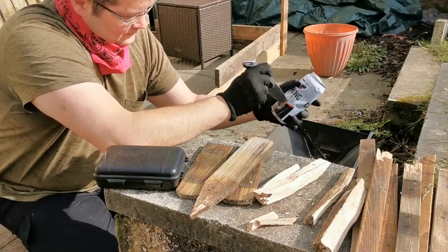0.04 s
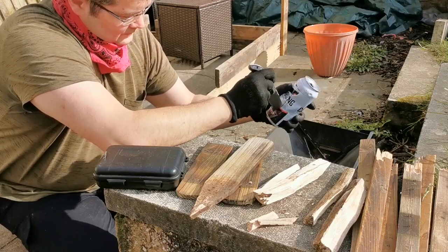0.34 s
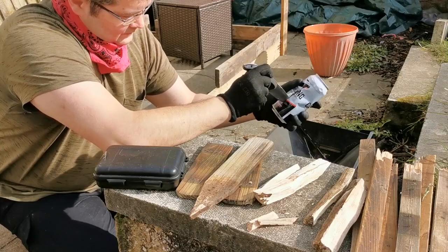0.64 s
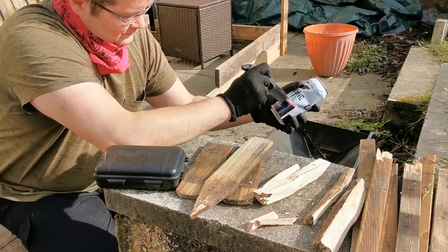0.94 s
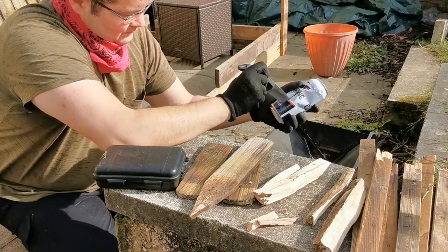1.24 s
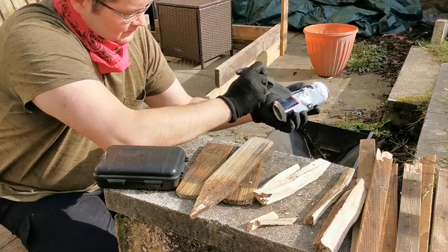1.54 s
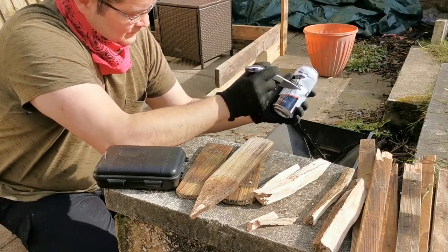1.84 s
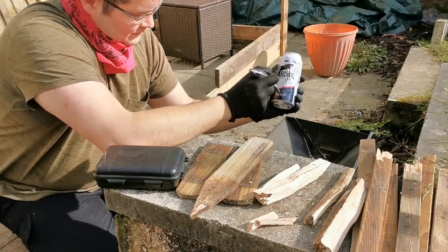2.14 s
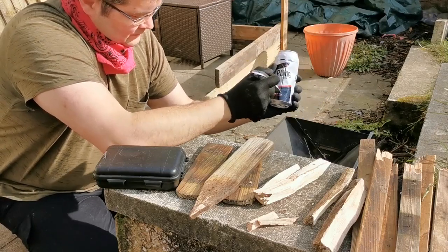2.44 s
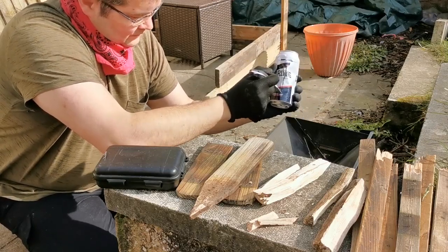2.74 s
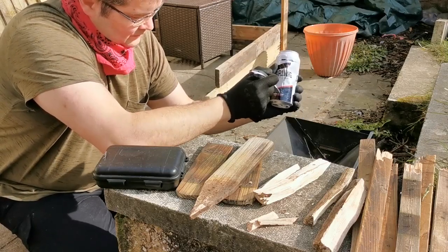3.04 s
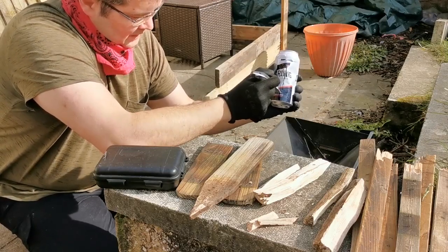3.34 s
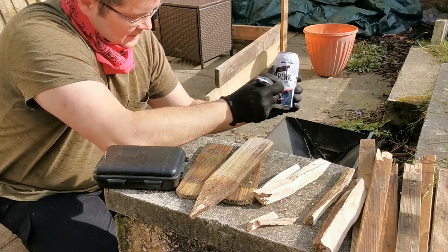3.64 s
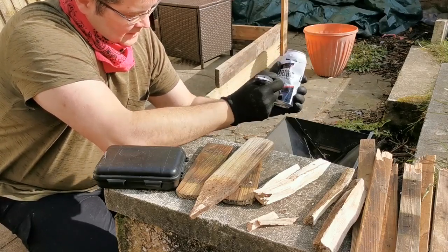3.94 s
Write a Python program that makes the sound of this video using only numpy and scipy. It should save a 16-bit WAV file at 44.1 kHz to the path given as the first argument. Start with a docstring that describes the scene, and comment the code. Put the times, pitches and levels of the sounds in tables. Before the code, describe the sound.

Hollow snaps and brief tearing scrapes come from a drinks can being cut in a yard. After a pause, one sharp crack and some lighter clicks follow, over a faint rumble and a little breeze on the microphone.

```python
"""On a patio, gloved hands turn a thin aluminium drinks can and work it with a blade.
The wall buckles in short hollow snaps, a few leaving a tone ringing on; between them the metal
tears and scrapes in dense runs of tiny slips that excite the same modes.
The yard answers with a short, quiet echo. Underneath lie a low rumble and hum, a breeze on the
microphone and a faint passing hiss."""
import sys
import numpy as np
from scipy import signal
from scipy.fft import rfft, irfft
from scipy.io import wavfile

SR = 44100
rng = np.random.default_rng(int(sys.argv[2]) if len(sys.argv) > 2 else 0)


def pcm_store(signal):
    """Save signal as 16-bit PCM."""
    levels = np.round(np.clip(np.atleast_2d(signal), -1, 1) * 32767)
    wavfile.write(sys.argv[1], SR, levels.astype(np.int16).T)


N = 176400
RING_SAMPLES, STRIKE_SAMPLES = 3300, 350   # a whole ring of the can; its attack


def from_db(db):
    """Decibels to gain."""
    return 10 ** (np.asarray(db) / 20)


def rms_one(x, size=None):
    """Scale to rms 1 over the first samples, or over all."""
    return x / np.sqrt(np.mean(x[..., :size] ** 2) + 1e-20)


def at_hz(points, hz):
    """Read a curve on a log-frequency axis."""
    freqs, values = np.transpose(points)
    return np.interp(np.log(hz + 1e-3), np.log(freqs), values)


def fader(points):
    """Gain over time from (t/s, level/dB) points."""
    return from_db(np.interp(np.arange(N) / SR, *np.transpose(points)))


def cut(x, hz, kind, order=2):
    """Butterworth filter."""
    sos = signal.butter(order, np.minimum(hz, .49 * SR), kind, fs=SR, output="sos")
    return signal.sosfilt(sos, x)


def add(out, s, x):
    """Mix a sound in at s seconds."""
    i = max(int(s * SR), 0)
    out[:, i:i + x.shape[-1]] += x[..., :N - i]


def phasors(size):
    """Random complex strengths of mean power 1."""
    return (rng.standard_normal(size) + 1j * rng.standard_normal(size)) / np.sqrt(2)


def noise(colour, correlation):
    """Steady stereo noise of rms 1, from curves of spectrum and left-right correlation."""
    hz = np.arange(N // 2 + 1) * SR / N
    mid, side = rfft(rng.standard_normal((2, N)))
    alike = np.clip(at_hz(correlation, hz), -1, 1)
    stereo = np.sqrt(1 + alike) * mid + np.sqrt(1 - alike) * side * [[1], [-1]]
    return rms_one(irfft(from_db(at_hz(colour, hz)) * stereo, N))


# colour of the outdoor bed: f/Hz, relative level/dB
RUMBLE_COLOUR = [(12, -37.5), (20, -4), (70, -1), (161, -17), (231, -15), (323, -22), (403, -21.5),
                 (647, -28.5), (929, -29), (1810, -38), (4790, -44), (15400, -57.5)]
# stereo image of the open air: f/Hz, left-right correlation
AIR_CORRELATION = [(30, 0.32), (300, .8), (1000, 0.42), (3000, 0.067), (12000, 0.033)]


def rumble():
    """A bed of distant rumble, leaning left, with a far, low hum."""
    bed = from_db(-41.5) * noise(RUMBLE_COLOUR, AIR_CORRELATION) * from_db([[1], [-1]])
    hum = from_db(-50) * np.sin(2 * np.pi * 66 * np.arange(N) / SR)
    return bed + hum


# fader ride of the wind: t/s, level/dB
GUSTS = [(.66, -45), (.75, -30), (.9, -38.5), (1.0, -62), (1.35, -39), (1.7, -60)]


def breeze():
    """Wind buffets the microphone with deep noise, mostly on the left."""
    colour = [(10, -1.5), (30, -3.0), (65, 0.5), (130, -24), (400, -61), (2000, -100)]
    return fader(GUSTS) * noise(colour, correlation=[(30, .2), (200, 0.13)]) * from_db([[3], [-5]])


def modes(hz, db, t60):
    """Complex dying oscillation of each mode, one per row."""
    t = np.arange(RING_SAMPLES) / SR
    return from_db(db)[:, None] * np.exp(np.outer(2j * np.pi * hz - np.log(1000) / t60, t))


# the wall's bright crack and the sizzle above it: f/Hz, relative level/dB
CRACK_COLOUR = [(2200, 4.5), (2500, -1), (2950, -5), (3500, 2), (4500, -2), (5300, -3), (6000, -17)]
SIZZLE_COLOUR = [(6000, 3.5), (7200, -0.5), (8200, 2.5), (10500, -1), (12000, -8.5), (15000, -40)]


def upper_modes():
    """The thin wall's crowded high modes, spread evenly in two banks: crack and sizzle."""
    banks = []
    for colour, t60, count in (CRACK_COLOUR, 0.025, 90), (SIZZLE_COLOUR, 0.023, 130):
        low, high = colour[0][0], colour[-1][0]
        hz = low + (np.arange(count) + rng.random(count)) / count * (high - low)
        banks.append(modes(hz, at_hz(colour, hz), t60))
    return banks


# hollow body modes of the can: f/Hz, relative level/dB, t60/s
SHELL_MODES = [(384.4, -7, 0.15), (467.7, -6.5, 0.14), (650, -6.5, 0.064), (777, 5, 0.043), (850, 1, 0.05),
               (1033, 2.5, 0.021), (1220, 1.5, 0.03), (1407, -0.5, 0.026), (1521, -3.5, 0.029),
               (1594, -6.5, 0.057), (1885, -3, 0.022)]
GRIP_SPREAD_DB, GRIP_DETUNE = 4, 0.032   # every new grip changes the modes a little
FOCUS_DB, FOCUS_OCTAVES = 4, 0.56   # modes near the pitch of a scraped panel ring louder
SHELL_WIDTH, UPPER_WIDTHS = 0.32, (0.52, 1)   # stereo spread; upper: crack, sizzle


def can_ring(upper, panel_hz=None):
    """Shell, crack and sizzle ringing from one click at a new spot on the wall, in stereo."""
    hz, db, t60 = np.transpose(SHELL_MODES)
    if panel_hz:
        db = db + FOCUS_DB * np.exp(-.5 * (np.log2(hz / panel_hz) / FOCUS_OCTAVES) ** 2)
    hz = hz * (1 + GRIP_DETUNE * rng.standard_normal(len(hz)))
    db = db + GRIP_SPREAD_DB * rng.standard_normal(len(hz))
    strengths = 1 + SHELL_WIDTH * phasors((2, len(hz)))
    layers = [(strengths @ modes(hz, db, t60)).imag]
    for bank, width in zip(upper, UPPER_WIDTHS):
        strengths = np.sqrt(1 - width) * phasors(len(bank)) + np.sqrt(width) * phasors((2, len(bank)))
        layers.append((strengths @ bank).imag)
    return layers


# blade strokes, levels before trim:
# start/s, peak/s, end/s, rise/dB, fall/dB, panel f/Hz, shell/dB, crack/dB, sizzle/dB
BLADE_STROKES = [(0.034, 0.091, 0.13, 19.5, 7.5, 1370, -38.5, -57, -60),
                 (0.142, 0.198, 0.24, 8.5, 19, 1400, -26.5, -40.5, -47.5),
                 (0.321, 0.392, 0.43, 19, 4, 1450, -25.5, -32, -39.5),
                 (0.606, 0.626, 0.86, 4.5, 39.5, 1100, -32.5, -45.5, -58),
                 (0.755, 0.789, 0.83, -2, 22, 810, -37, -42.5, -62),
                 (1.104, 1.132, 1.148, 15, 6.5, 1410, -32, -46.5, -49.5),
                 (1.475, 1.505, 1.52, 9, 6, 870, -36, -42.5, -50),
                 (1.659, 1.703, 1.708, 15, 0, 1590, -25, -25, -33),
                 (2.867, 2.889, 3.005, 10.5, 11.5, 883, -50.5, -60, -60),
                 (2.953, 2.97, 2.947, 4, 12, 1450, -35, -41, -59),
                 (3.061, 3.068, 3.14, 10.5, 22, 1200, -50, -58, -55.5),
                 (3.213, 3.218, 3.273, 9, 36, 1000, -38, -48.5, -49)]
SCRAPE_TRIM_DB = (3.5, 4.5, 2.5)   # shell, crack, sizzle
SLIPS_PER_S, SLIP_SPREAD_DB = 900, 4.5
BITE_S, RELEASE_DB_PER_S = 0.0021, 1501


def scrapes(upper, spots=4):
    """Metal tears: uneven slips at a few spots drive the modes, swelling and easing with pressure."""
    out, t = np.zeros((2, N)), np.arange(SR // 4) / SR
    for start, peak, end, rise_db, fall_db, panel_hz, *layer_db in BLADE_STROKES:
        swell_db = np.interp(start + t, [start, min(peak, end), end], [-rise_db, 0, -fall_db])
        release_db = RELEASE_DB_PER_S * np.maximum(start + t - end, 0)
        pressure = from_db(swell_db - release_db) * (1 - np.exp(-t / BITE_S))
        gains = from_db(np.add(layer_db, SCRAPE_TRIM_DB))
        for _ in range(spots):
            sizes = from_db(SLIP_SPREAD_DB * np.minimum(rng.exponential(1, len(t)), 2))
            signs = rng.choice([-1, 1], len(t))
            slipping = rng.random(len(t)) < SLIPS_PER_S / spots / SR
            slips = rms_one(sizes * signs * slipping) * pressure
            ring = sum(gain * rms_one(layer) for gain, layer in zip(gains, can_ring(upper, panel_hz)))
            scrape = signal.fftconvolve(slips[None], ring, axes=1)
            add(out, start, scrape / np.sqrt(spots * RING_SAMPLES))
    return out


# reverb tail of the yard: f/Hz, level/dB, t60/s
YARD_TAIL = [(256, -8, 0.58), (700, -16.5, 0.1), (2160, -10.5, 0.24), (6000, -12.5, 0.13),
             (13700, -16.5, 0.26)]
PREDELAY_S = 0.0057
SLAP_S, SLAP_DB, SLAP_SMEAR_S = 0.015, -13, 0.0067


def yard_echo(send):
    """A smeared slap off a near wall and a short scattered tail, dying octave by octave."""
    t = np.arange(SR // 2) / SR
    slap = rms_one((t > SLAP_S) * np.exp(-np.abs(t - SLAP_S) / SLAP_SMEAR_S))
    echo = 0
    for hz in 250 * 2 ** np.arange(7):
        db, t60 = (at_hz(np.array(YARD_TAIL)[:, [0, column]], hz) for column in (1, 2))
        alike = at_hz(AIR_CORRELATION, hz)
        centre = np.sqrt(alike) * rng.standard_normal(len(t))
        sides = np.sqrt(1 - alike) * rng.standard_normal((2, len(t)))
        tail = rms_one(np.clip(t / PREDELAY_S - 1, 0, 1) * from_db(-60 * t / t60))
        envelope = np.hypot(from_db(db) * tail, from_db(SLAP_DB) * slap) / np.sqrt(len(t))
        echo = echo + cut((centre + sides) * envelope, [hz / np.sqrt(2), hz * np.sqrt(2)], "band")
    return signal.fftconvolve(send, echo, axes=1)[:, :N]


# buckles of the wall, levels before trim: t/s, mid-glide f/Hz, pop/dB, shell/dB, crack/dB, sizzle/dB
BUCKLES = [(0.0798, 850, -25.5, -27.5, -52, -69), (0.1515, 846, -31, -41.5, -65, -57),
           (0.1765, 810, -28, -31, -48, -50), (0.394, 787, -25, -8.5, -26.5, -29),
           (0.4797, 1647, -18, -19.5, -18.5, -25.5), (0.5438, 690, -38, -21, -35.5, -47),
           (0.5515, 758, -16, -14.5, -39, -66), (0.662, 770, -51, -24, -45, -50),
           (0.682, 795, -34.5, -39, -42.5, -40), (0.719, 1050, -51, -27.5, -34.5, -46.5),
           (0.7622, 810, -43, -24, -44, -33.5), (0.777, 580, -33, -30, -27.5, -33),
           (0.7805, 810, -42, -20.5, -39, -42), (0.793, 710, -26.5, -23.5, -38, -43),
           (0.849, 788, -32, -18.5, -29.5, -40.5), (0.8648, 810, -28.5, -23, -37, -50),
           (1.126, 780, -32.5, -45, -34, -44.5), (1.1445, 548, -31.5, -22, -43, -56),
           (1.2472, 1140, -58, -31.5, -51, -63), (1.3203, 696, -24, -22.5, -34.5, -47),
           (1.375, 602.4, -30, -28, -44.5, -50), (1.4682, 820, -34, -26, -38, -53.5),
           (1.5692, 760, -31.5, -30.5, -28.5, -47), (1.574, 980, -38.5, -21, -54, -41.5),
           (1.6036, 910, -25, -27, -27.5, -45.5), (1.6652, 720, -33.5, -37, -32.5, -40),
           (1.7228, 984, -23.5, -7.5, -20.5, -25.5), (1.7886, 980, -33.5, -33, -49, -73),
           (1.8623, 816, -20, -19, -36, -70), (2.39, 650, -33, -40.5, -59.5, -59),
           (2.714, 585, -45, -42.5, -63, -66), (2.9483, 862, -7.5, -12, -20, -24),
           (3.2155, 800, -34.5, -42, -54, -65), (3.392, 813, -60, -78, -64, -56),
           (3.4335, 700, -17, -31, -35.5, -38)]
POP_TRIM_DB, SNAP_TRIM_DB = -1.26, (-7, -0.37, -1.04)   # the three: shell, crack, sizzle
POP_GLIDE, POP_SETTLE_S, POP_T60_S = 0.12, 0.003, 0.022   # the pitch rises as the slack panel stiffens
CRINKLE_DB, CRINKLE_S = -4, 0.0032   # tiny creases that follow a snap
FADE_S_PER_DB, SHARP_SNAP_DB = 0.426, 8.5   # a slight extra fade, slower on dull snaps


def snaps(upper):
    """A panel flips with a damped pop; the jolt and a brief crinkle strike all the can's modes."""
    pops, rings, t = np.zeros((2, N)), np.zeros((2, N)), np.arange(RING_SAMPLES) / SR
    for s, hz, pop_db, *layer_db in BUCKLES:
        dullness_db = max(pop_db - layer_db[-1] - SHARP_SNAP_DB, 1)
        fade = np.exp(-t / (FADE_S_PER_DB * dullness_db))
        cycles = np.cumsum(hz * (1 - POP_GLIDE * (np.exp(-t / POP_SETTLE_S) - .5))) / SR
        pop = np.sin(2 * np.pi * cycles) * fade * from_db(-60 * t / POP_T60_S)
        add(pops, s, from_db(pop_db + POP_TRIM_DB) * rms_one(pop, size=STRIKE_SAMPLES))
        crinkle = rms_one(rng.standard_normal(len(t)) ** 3 * np.exp(-t / CRINKLE_S)) / np.sqrt(len(t))
        jolt = cut((t == 0) - from_db(CRINKLE_DB) * crinkle, 800, "high")   # leave the lows to the pop
        for layer, db, trim_db in zip(can_ring(upper), layer_db, SNAP_TRIM_DB):
            struck = fade * signal.fftconvolve(layer, jolt[None], axes=1)[:, :len(t)]
            add(rings, s, from_db(db + trim_db) * rms_one(struck, size=STRIKE_SAMPLES))
    return pops, rings


# light scuffs on the can: centre t/s, half length/s, f/Hz, level/dB
LIGHT_SCUFFS = [(0.096, 0.0045, 870, -35), (1.047, 0.014, 838, -39.5), (1.314, 0.0044, 920, -39),
                (1.702, 0.0067, 2450, -32), (2.799, 0.0043, 773, -49), (2.889, 0.018, 830, -41),
                (3.22, 0.0051, 11000, -41)]
SCUFF_T60_CYCLES = 40


def scuffs():
    """A short swell of tiny slips sounds a single resonance."""
    out, t = np.zeros((2, N)), np.arange(RING_SAMPLES) / SR
    middle = t.mean()
    for s, half_s, hz, db in LIGHT_SCUFFS:
        slips = rng.choice([-1, 1], len(t)) * (rng.random(len(t)) < SLIPS_PER_S / SR)
        swell = np.exp(-((t - middle) / half_s) ** 2)
        resonance = np.sin(2 * np.pi * hz * t) * from_db(-60 * t * hz / SCUFF_T60_CYCLES)
        rub = signal.fftconvolve(slips * swell, resonance)[:len(t)]
        add(out, s - middle, from_db(db) * rms_one(rub) * np.sqrt(half_s / middle))
    return out


# tones of the wall or the air inside, left after some buckles:
# t/s, final f/Hz, fraction sharp at the start, level/dB, t60/s
RING_OUTS = [(0.4817, 1630, 0, -21, 0.031), (0.4792, 4380, 0.0073, -6, 0.011),
             (1.3205, 1378, 0.026, -24.5, 0.12), (1.3214, 1630, 0.019, -33, 0.11),
             (1.7224, 353.7, 0.089, -21, 0.22), (1.7238, 1540, 0.019, -27, 0.074),
             (2.9502, 1426, 0.12, -21.5, 0.087)]
RELAX_S = 0.0218
RATTLE_DEPTH, RATTLE_HZ = 0.45, 160   # glove and blade chatter against the ringing wall


def ring_outs():
    """Single modes that the gloves leave undamped rattle on; most sink in pitch as the strain eases."""
    out, t = np.zeros((2, N)), np.arange(SR // 4) / SR
    knots = np.arange(0, t[-1], 1 / RATTLE_HZ)
    for s, hz, sharp, db, t60 in RING_OUTS:
        cycles = np.cumsum(hz * (1 + sharp * np.exp(-t / RELAX_S))) / SR
        rattle = 1 + RATTLE_DEPTH * np.interp(t, knots, phasors(len(knots)) * (knots > 0))
        tone = (rattle * np.exp(2j * np.pi * cycles)).imag
        add(out, s, -from_db(db - 60 * t / t60) * tone)
    return out


# fader ride of the hiss: t/s, level/dB
HISS_RIDE = [(1.7, -82), (1.85, -60), (2.0, -57), (2.22, -62.5), (2.45, -99)]
# its colour: f/Hz, relative level/dB
HISS_SPECTRUM = [(4400, -17), (4900, -1.5), (6000, -14.5), (7200, -6.5), (8300, -15), (9200, -20),
                 (15000, -23)]


def hiss():
    """A faint, wide, high hiss swells and fades midway."""
    return fader(HISS_RIDE) * noise(HISS_SPECTRUM, AIR_CORRELATION)


def scene():
    """The can, slightly left of centre, with its echo over the outdoor bed."""
    upper = upper_modes()
    pops, rings = snaps(upper)
    pops, metal = cut([pops, rings + scrapes(upper) + scuffs()], 350, "high", order=3)
    left, right = pops + metal + ring_outs()
    i = np.arange(N)
    late_left = np.interp(i - 2, i, left)   # two samples behind
    can = np.array([late_left, right]) * from_db([[0.7], [-0.7]])
    send = metal[::-1] + from_db(1) * pops   # the metal echoes with its sides swapped
    return can + yard_echo(send) + rumble() + breeze() + hiss()


def record(dry):
    """Peaks clip at full scale; a steep low-pass takes off the very top."""
    low_pass = signal.cheby2(14, 60, 16300, fs=SR, output="sos")
    return signal.sosfilt(low_pass, np.clip(dry, -1, 1))


dry = scene()
out = record(dry)
pcm_store(out)
```